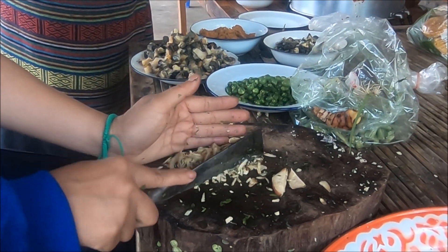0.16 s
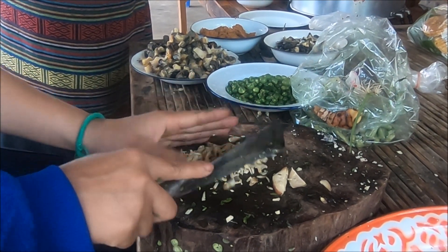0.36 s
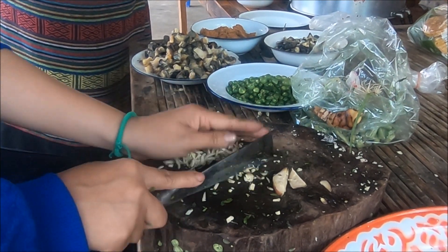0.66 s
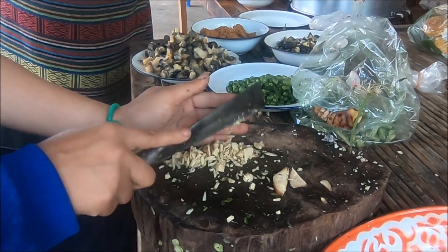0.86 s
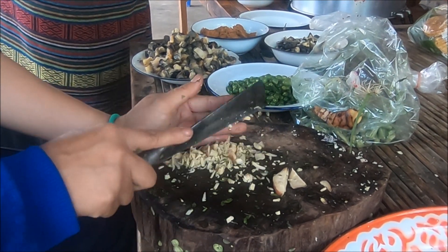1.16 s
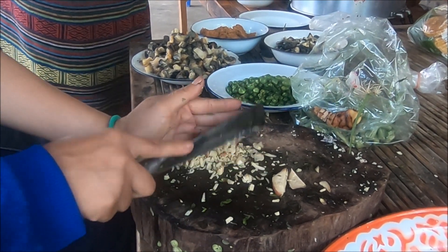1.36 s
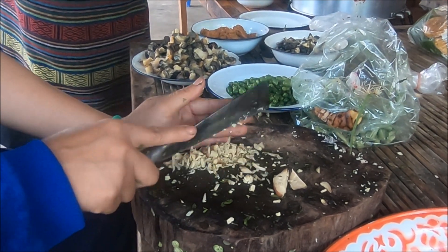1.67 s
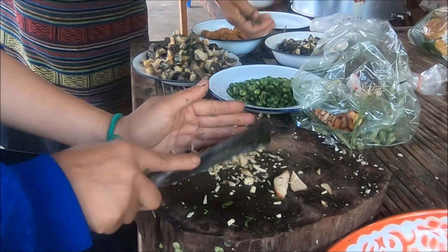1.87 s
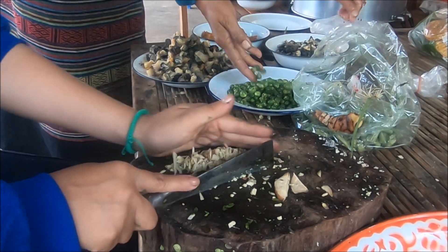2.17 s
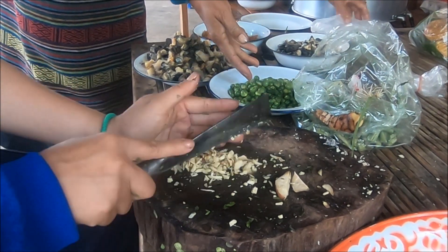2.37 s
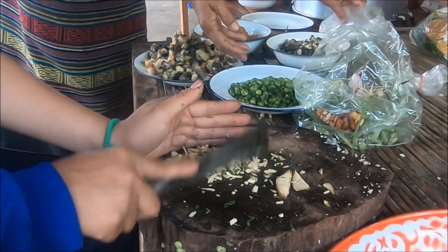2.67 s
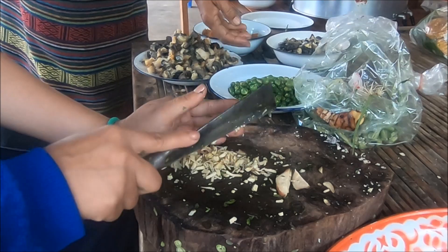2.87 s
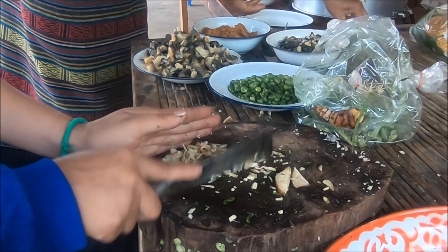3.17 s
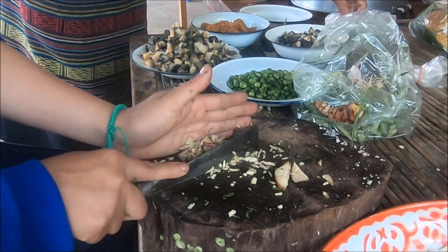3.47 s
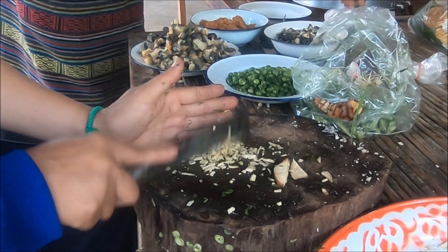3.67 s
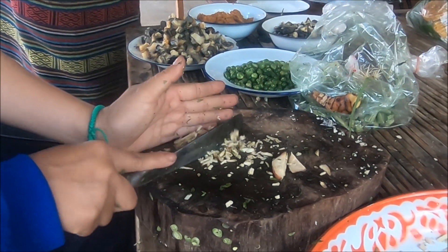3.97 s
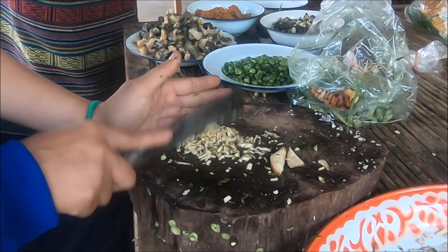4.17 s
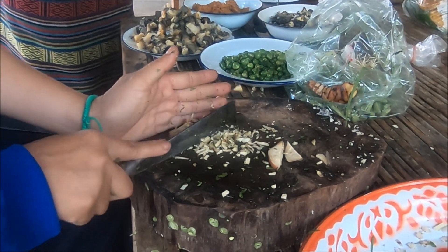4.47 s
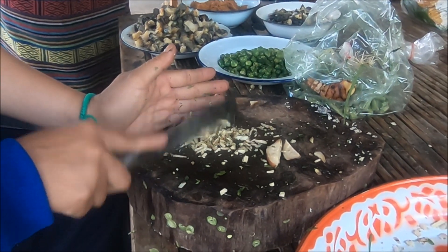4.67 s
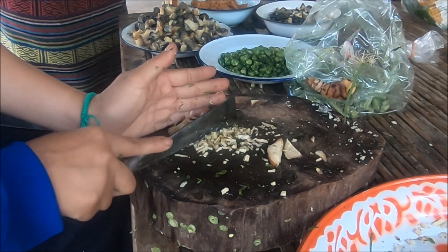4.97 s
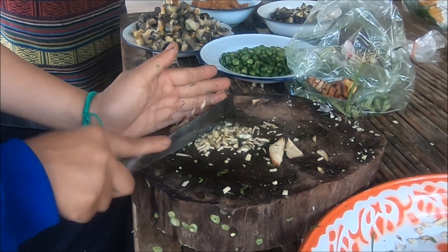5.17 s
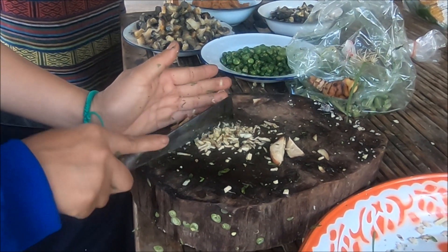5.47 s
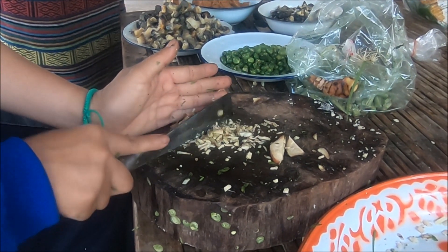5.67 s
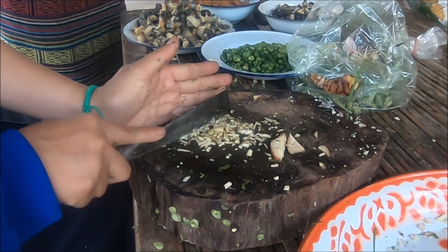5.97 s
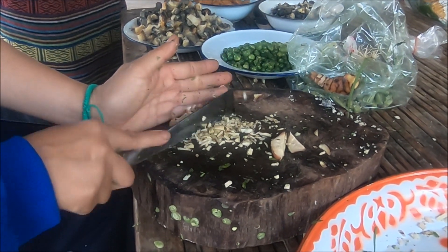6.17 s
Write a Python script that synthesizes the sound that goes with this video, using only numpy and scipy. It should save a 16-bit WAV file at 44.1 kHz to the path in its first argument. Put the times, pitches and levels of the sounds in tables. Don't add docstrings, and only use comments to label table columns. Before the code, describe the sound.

Sharp metallic-woody chops land close to a small stereo microphone in an open shelter. After the first pair the blade drags softly across the wood, then the mincing resumes in an even, quick rhythm with uneven force and one brief skip. Crumbs tick, plastic rustles quietly, and low wind buffets swell strongest past the middle. Far behind are thin chick peeps, airy hiss and a faint motor.

```python
import sys
import numpy as np
from scipy import signal
from scipy.fft import rfft, irfft, next_fast_len
from scipy.io import wavfile
from scipy.ndimage import uniform_filter1d

SR = 44100
rng = np.random.default_rng(int(sys.argv[2]) if len(sys.argv) > 2 else 0)


def to_wav(sig):
    pcm = np.clip(np.atleast_2d(sig), -1, 1) * 32767
    pcm = np.round(pcm).astype(np.int16)
    wavfile.write(sys.argv[1], SR, pcm.T)


def volts(x):
    e = np.asarray(x, float) / 20
    return 10 ** e


N = 278271

CHOPS = [(0.0226, -11.5, -21.5, -9.5, -13), (0.2904, -18, -47, -67, -39), (1.129, -21.5, -50.5, -34.5, -64),
         (1.3988, -6, -22, -9.5, -14.5), (1.6556, -18, -24.5, -17.5, -19.5),
         (1.9188, -7.5, -19.5, -18, -15), (2.604, -11.5, -78, -32, -42), (2.8517, -22, -24, -15, -15),
         (3.1012, -9, -22.5, -16.5, -9.5), (3.3487, -17, -22, -39, -6.5),
         (3.6144, -65, -28.5, -19.5, -21.5), (3.8551, -24.5, -33, -30.5, -35),
         (4.1071, -20, -22.5, -10, -18), (4.3597, -25, -26, -11.5, -19), (4.608, -9, -23, -12.5, -14.5),
         (4.852, -13.5, -25.5, -3.5, -12), (5.0948, -10.5, -21.5, -12.5, -17.5),
         (5.3392, -15.5, -21, -17, -14.5), (5.5863, -18, -21, -17.5, -13.5),
         (5.8331, -9.5, -22, -15.5, -14.5), (6.0745, -24.5, -41, -34, -40)]
# pitch in Hz, level in dB, time to die by 60 dB in seconds.
TIP_MODES = [(6975, -3, 0.014), (6480, -27, 0.0033), (7630, 8.5, 0.0047), (6400, -10.5, 0.012)]
HEEL_MODES = [(2553, 9.5, 0.021), (2644, -2, 0.078)]
BEND_MODES = [(4190, 15, .035), (4183, -19, .4), (4550, 2, .015)]
TWIST_MODES = [(5388, 17.87, 0.0065), (5442, 17.15, 0.0085)]
CRACK_MODES = [(2800, 9.8, 0.0065), (3435, 7.2, 0.0032), (4720, 13.5, 0.0012)]
BLOCK_MODES = [(1706, 9.85, 0.018), (1879, 2, 0.029), (1602, 6.04, 0.02), (2092, 1.3, 0.014),
               (2144, 1.1, 0.025), (1463, 2.2, 0.012)]
THUD_MODES = [(199.2, 1, 0.15), (439, 3.5, 0.026), (469.3, -5.5, 0.15), (508, 3.5, 0.035), (725, 4, 0.022),
              (833, 2, 0.028), (1068, 9, 0.0092), (1154, -16, 0.043)]
LEGS_MODES = [(145.1, 1.5, 0.29), (229.7, 0.5, 0.11)]
# time in seconds, bending against block in dB.
GRIP = [(0, -11), (1.6, -6), (1.9, 1.5), (3.35, 2.5), (3.6, -4.5), (4.1, -6), (4.36, -18), (6.3, -17.5)]
# pitch in Hz, level in dB.
SNAP_TONE = [(1000, 0.5), (2500, 4), (5000, 6.5), (8000, -1), (15000, -23)]
# pitch in Hz, level in dB.
JUICE_TONE = [(6000, -46.5), (8500, 1.5), (11000, -10), (15500, -20)]
# delay in seconds, level in dB.
TABLE_BOUNCE = [(.0006, -8), (.0009, -19)]
# pitch in Hz, level in dB.
MIC_TREBLE = [(7300, -6.5), (8300, -29), (9500, -21.5), (15500, -66)]
# pitch in Hz, time to die by 60 dB in seconds.
SHELTER_DECAY = [(150, 0.43), (500, 0.48), (1700, 0.47), (3000, 0.51), (4600, 0.53), (5430, 0.43),
                 (6300, 0.89), (8000, 0.46)]
# delay in seconds, level in dB.
WALL_ECHOES = [(.004, -14), (.007, -14), (.011, -15), (.0162, -7), (.023, -11), (.031, -12)]
# time in seconds, level in dB.
SWEEP_LEVEL = [(0.7, -79), (0.75, -49.5), (0.785, -38), (0.83, -43), (0.855, -34), (0.926, -40),
               (1.022, -50.5), (1.12, -66)]
# pitch in Hz, level in dB per Hz.
SWEEP_TONE = [(120, -19), (200, 4.5), (500, 4), (711, 0.5), (1090, -5), (1480, -11.5), (1910, -11.5),
              (2600, -10), (3150, -4), (3800, -20), (6990, -10), (8440, -23), (10000, -64), (15700, -68)]
# pitch in Hz, width in Hz, level in dB.
SCRAPE_RINGS = [(520, 24, -18.5), (686, 20, -13), (1500, 66, -13.5), (3200, 380, -36)]
# peak in seconds, level in dB, swell and fade in seconds.
CRINKLES = [(0.292, -68.5, 0.039, 0.013), (0.66, -84, 0.15, .1), (0.87, -72.5, 0.34, 0.084),
            (1.135, -64.5, 0.014, 0.0061), (1.224, -81.5, 0.11, 0.12), (1.42, -78, 0.022, 0.17),
            (1.64, -72.5, 0.079, 0.0092), (1.69, -68.5, 0.015, 0.11), (1.94, -80, .02, 0.12),
            (2.218, -81.5, 0.099, .03), (2.612, -62, 0.027, 0.18), (2.85, -66, 0.12, 0.17),
            (3.26, -72.5, 0.19, 0.33), (3.5, -80, 0.64, 0.27), (3.788, -78.5, 0.35, 0.15),
            (3.85, -66, 0.007, 0.051), (5.862, -66, .01, 0.036), (6.08, -70, 0.021, 0.04),
            (6.202, -84, 0.045, .06)]
# pitch in Hz, level in dB per Hz.
BAG_TONE = [(500, -15), (1400, -5), (3300, -3.5), (4500, -5.5), (6300, 1.5), (7450, 1), (8440, -15),
            (9500, -19), (13000, -31.5), (15700, -33)]
# start in seconds,
# level in dB, pitch in Hz.
TICKS = [(1.6933, -49, 5660), (2.2004, -39.5, 6360), (2.8213, -37, 3660), (2.8228, -33.5, 700),
         (3.768, -39, 6400), (4.0387, -38, 5440), (5.801, -43, 5500), (5.862, -36, 5440), (6.079, -53, 380),
         (0.3, -44, 380)]
# time in seconds, level in dB.
WIND_LEVEL = [(0.0, -38), (0.84, -46), (1.33, -41), (1.81, -49.5), (2.77, -48.5), (3.49, -37.5),
              (3.63, -38.5), (3.84, -52.5), (4.0, -32), (4.21, -41), (4.98, -40), (5.09, -48),
              (5.25, -44.5), (5.84, -42.5), (5.95, -42), (6.3, -47.5)]
# pitch in Hz, level in dB per Hz.
WIND_TONE = [(12, -15), (30, 14.5), (60, 8.5), (100, -2), (170, -10), (320, -71)]
# time in seconds, level in dB, pitch in Hz, left minus right in dB.
EDDIES = [(0.12, -20.5, 83.5, -5), (0.153, -23.5, 71.5, -1), (0.297, -28.5, 60.7, 0),
          (0.871, -23, 81.5, -2), (1.206, -28.5, 70, -2), (3.383, -10, 65.6, 7.5), (3.408, -24, 50.5, 3),
          (3.433, -18.5, 70, 13), (3.485, -19.5, 66, 4), (3.539, -16.5, 59, -4), (3.571, -14.5, 55.4, 4),
          (3.833, -14, 69, 10), (3.871, -16.5, 49, 2), (3.894, -21.5, 72, 16), (3.998, -25.5, 58.4, -22),
          (4.032, -15, 58.4, -5), (4.116, -22, 34, 2), (4.144, -28, 60, -10), (4.267, -22.5, 66.6, 4),
          (4.353, -17.5, 61.4, 8.5), (4.534, -25, 75.6, -4), (4.767, -31, 48.3, 6),
          (5.002, -20.5, 112, -16.5), (5.022, -15.5, 49.6, 0), (5.095, -23, 77, -3), (5.112, -30, 59.5, 9),
          (5.577, -23, 43.7, 1)]
# start in seconds, level in dB, pitch in Hz.
GUST_FRONTS = [(0.107, -15, 186), (3.557, -18.5, 225), (3.824, -15, 220), (3.985, -15.5, 218),
               (4.526, -24, 220), (4.991, -14, 285)]
# start in seconds, length in seconds, start and end pitch in Hz, level in dB.
PEEPS = [
    (1.245, 0.13, 4600, 3670, -56),
    (1.255, 0.055, 4950, 4700, -61.5),
    (2.26, 0.083, 7000, 6950, -62),
    (2.348, 0.14, 4580, 3800, -57.5),
    (3.008, 0.065, 4950, 4900, -59),
    (3.87, 0.097, 4540, 3760, -58.5),
    (4.52, 0.08, 3000, 3100, -63),
    (5.5, 0.055, 3050, 3120, -60),
    (6.124, 0.074, 4500, 4040, -63.5),
]
# pitch in Hz, level in dB per Hz.
YARD_TONE = [(59, -54), (100, 0), (184, 4.5), (272, -11), (425, -14.5), (845, -16.5), (1270, -17.5),
             (1500, -18.5), (2770, -21.5), (4000, -23), (6750, -18.5), (7690, -25.5), (9000, -44.5),
             (12000, -63), (16000, -77)]
# pitch in Hz, likeness from -1 to 1.
YARD_LIKENESS = [(100, 0.055), (240, 0.97), (500, -0.37), (1000, -0.24), (2000, 0.27), (4000, 0.53),
                 (8000, -0.15)]
# pitch in Hz, width in Hz, level in dB.
MOTOR = [(178, 14, -58), (856, 16, -67.5), (340, 20, -69)]


def cleaver():
    near, snaps, juice, *far = np.zeros((5, N))
    chance = rng.standard_normal((len(CHOPS), 10))
    bite = rng.standard_normal((len(CHOPS), 600))
    lead = 260
    t = np.arange(-lead, 340) / SR
    blow = 1. * (t[:lead + 40] == 0)
    for (s, tip, block, crack, twist), luck, fibres in zip(CHOPS, chance, bite):
        start = s - lead / SR
        spot = far[int(luck[1] > 0)]
        edge = blow + .35 * luck[0] * np.roll(blow, shift=24) + .25 * luck[1] * np.roll(blow, shift=11)
        bend = max(block + np.interp(s, *np.transpose(GRIP)), -43)
        heel = min(crack, -16) - 0.67 * max(tip + 25, 0)
        thud = -26 + 0.7 * (block + 26)
        legs = -30 + 0.09 * (block + 26)
        twist_send = 3 + block - twist
        # modes, level in dB, share the shelter hears in dB, push
        parts = [(TIP_MODES, tip, -58, edge), (BLOCK_MODES, block, -0.5, blow),
                 (THUD_MODES, thud, -2, blow), (CRACK_MODES, crack, -20.5, edge),
                 (BEND_MODES, bend, -25, blow), (TWIST_MODES, twist, twist_send, blow),
                 (LEGS_MODES, legs, -35, blow), (HEEL_MODES, heel, -19.5, blow)]
        for (modes, db, send_db, push), drift in zip(parts, luck[2:]):
            tone = ring(modes, db, detune=1 + .006 * drift, rise=.0005)
            sound = signal.oaconvolve(tone, push)
            add(near, start, sound)
            add(spot, start, volts(send_db) * sound)
        split = np.where(t < 0, .14 * (1 + t / -t[0]) ** 2, volts(-60 * t / .018))
        add(snaps, start, volts(-15.5 + 0.57 * (twist + 19)) * split * fibres)
        add(juice, start, volts(-40 - 60 * abs(t) / 0.0081) * fibres[::-1])
    snaps = colour(snaps, SNAP_TONE)
    near = near + snaps
    echoes = shelter(far[0] + volts(-9.0) * snaps) + shelter(far[1])
    bounce = np.array([volts(db) * np.roll(near, round(s * SR)) for s, db in TABLE_BOUNCE])
    knocks = colour(near * volts([[.3], [-.3]]) + bounce + echoes, MIC_TREBLE)
    spit = juice * [[.6], [1.1]] + np.roll(juice, shift=3) * [[.3], [-.6]]
    return knocks + colour(spit, JUICE_TONE)


def ring(modes, db, detune, rise):
    longest = max(t60 for hz, g, t60 in modes)
    t = np.arange(min(SR // 4, round(1.3 * SR * longest))) / SR
    tones = 0
    for k, (hz, g, t60) in enumerate(modes):
        tones = tones + volts(g - 60 * t / t60) * np.sin(2 * np.pi * hz * detune * t + np.pi * k)
    return volts(db) * (1 - np.exp(-t / rise)) * tones


def shelter(x):
    taps = np.zeros((2, SR))
    at = np.arange(420, SR - 20, 20) + rng.integers(0, 20, (2, (SR - 421) // 20))
    np.put_along_axis(taps, at, rng.choice([-1., 1.], at.shape), 1)
    hz, t, z = signal.stft(taps, SR, nperseg=256)
    fade = volts(-60 * t / read(SHELTER_DECAY, hz)[:, None])
    tail = signal.istft(z * fade, SR, nperseg=256)[1]
    tail /= np.linalg.norm(tail[0])
    for k, (s, db) in enumerate(WALL_ECHOES):
        tail[0, round(s * SR)] += volts(db)
        tail[1, round(s * SR) + 9 * (-1) ** k] += volts(db)
    return signal.fftconvolve(x[None], tail, axes=1)[:, :N]


def sweep():
    slips = grains(per_s=900, spread_db=3.0, smooth=1.2)
    scrape = evened(colour(slips, SWEEP_TONE))
    rings = sum(volts(db) * evened(resonate(slips, hz, width)) for hz, width, db in SCRAPE_RINGS)
    drag = volts(-2.5) * (scrape + rings) * level(SWEEP_LEVEL)
    return drag + volts(-9.0) * shelter(drag[0])


def bag():
    crackle = evened(colour(grains(per_s=1900, spread_db=5.0, smooth=2.05), BAG_TONE))
    ticks, t = np.zeros(N), np.arange(900) / SR
    for s, db, hz in TICKS:
        tone = evened(resonate(rng.standard_normal(len(t)), hz, min(900, 0.48 * hz)))
        add(ticks, s, volts(db - 60 * t / 0.067) * tone)
    return volts(25.0) * crackle * crinkles() + colour(ticks, MIC_TREBLE)


def crinkles():
    t = np.arange(N) / SR
    gain = 0
    for s, db, swell, fade in CRINKLES:
        away = np.maximum((s - t) / swell, (t - s) / fade)
        gain = gain + volts(db - 20 * away)
    return gain


def wind():
    lumps = volts(0.45 * evened(uniform_filter1d(rng.standard_normal((2, N)), size=1500, axis=1)))
    air = rng.standard_normal((2, N)) + 1.03 * rng.standard_normal(N)
    out = volts(2.5) * level(WIND_LEVEL) * evened(colour(air, WIND_TONE)) * lumps
    for s, db, hz, pan_db in EDDIES:
        u = np.linspace(0, 4, round(4 * SR / hz))
        swell = (1 - np.exp(-(u / 0.35) ** 2)) * np.exp(-u / 0.53) * np.cos(np.pi * u / u[-1] / 2) ** 2
        jolt = -2.6 * swell * np.sin(2 * np.pi * 1.09 * u ** 0.82)
        add(out[0], s - 0.5 / hz, volts(db + pan_db / 2) * jolt)
        add(out[1], s - 0.4 / hz, volts(db - pan_db / 2) * jolt)
    for s, db, hz in GUST_FRONTS:
        u = np.linspace(0, 3, round(3 * SR / hz))
        swell = np.sin(np.pi * u / 3) ** 2 * np.exp(-u / 0.56)
        add(out, s, -volts(db) * swell * np.sin(2 * np.pi * u ** 0.67) * [[3.], [2.4]])
    return out


def chicks():
    peeps = np.zeros(N)
    for s, length, start_hz, end_hz, db in PEEPS:
        u = np.linspace(0, 1, round(length * SR))
        hz = end_hz + (start_hz - end_hz) * np.exp(-4.5 * u)
        width = 280 + 0.45 * abs(start_hz - end_hz)
        whistle = resonate(resonate(rng.standard_normal(len(u)), hz, width), hz, width)
        add(peeps, s, volts(db) * evened(whistle) * np.sin(np.pi * u) ** 0.14)
    return 0.93 * peeps + 1.07 * shelter(peeps)


def yard():
    motor = 0
    for hz, width, db in MOTOR:
        hum = resonate(resonate(rng.standard_normal((2, N)), hz, width), hz, 4 * width)
        motor = motor + volts(db) * evened(hum)
    return volts(-48.5) * hiss(YARD_TONE, YARD_LIKENESS, patchy_db=1.5) + motor


def hiss(points, likeness, patchy_db):
    frames, hz = N // 256 + 5, np.fft.rfftfreq(1024, 1 / SR)
    a, b, c, d, patches = rng.standard_normal((frames, 513, 5)).T
    patches = uniform_filter1d(uniform_filter1d(patches, size=12, axis=0), size=10, axis=1)
    same = np.clip(read(likeness, hz), -1, 1)[:, None]
    left = a + 1j * b
    right = same * left + np.sqrt(1 - same ** 2) * (c + 1j * d)
    z = np.array([left, right]) * volts(read(points, hz)[:, None] + patchy_db * evened(patches))
    return evened(signal.istft(z, nperseg=1024, noverlap=768)[1][:, :N])


def grains(per_s, spread_db, smooth):
    size = volts(spread_db * np.minimum(rng.exponential(1, N), 4)) * rng.choice([-1, 1], N)
    clicks = evened(size * (rng.random(N) < per_s / SR))
    return evened(clicks + smooth * rng.standard_normal((2, N)))


def resonate(x, hz, width):
    turn = np.exp(2j * np.pi * np.cumsum(hz * np.ones(x.shape[-1])) / SR)
    r = np.exp(-np.pi * width / SR)
    return 2 * (turn * signal.lfilter([1 - r], [1, -r], x / turn)).real


def colour(x, points):
    size = next_fast_len(N)
    gain = volts(read(points, np.fft.rfftfreq(size, 1 / SR)))
    return irfft(rfft(x, size) * gain, size)[..., :N]


def read(points, hz):
    f, value = np.transpose(points)
    return np.interp(np.log(hz + 1), np.log(f + 1), value)


def level(rows):
    s, db = np.transpose(rows)
    return volts(np.interp(np.arange(N) / SR, s, db, -140, -140))


def evened(x):
    return x / np.sqrt(np.mean(x ** 2) + 1e-20)


def add(mix, s, sound):
    part = mix[..., max(round(s * SR), 0):][..., :sound.shape[-1]]
    part += sound[..., :part.shape[-1]]


def scene():
    return cleaver() + sweep() + bag() + wind() + chicks() + yard()


def low_pass(x):
    return signal.sosfilt(signal.butter(12, 15780, fs=SR, output="sos"), x)


def record(dry):
    low_cut = signal.butter(2, 18, "high", fs=SR, output="sos")
    mix = signal.sosfilt(low_cut, dry)
    return low_pass(mix)


dry = scene()
out = record(dry)
to_wav(out)
```